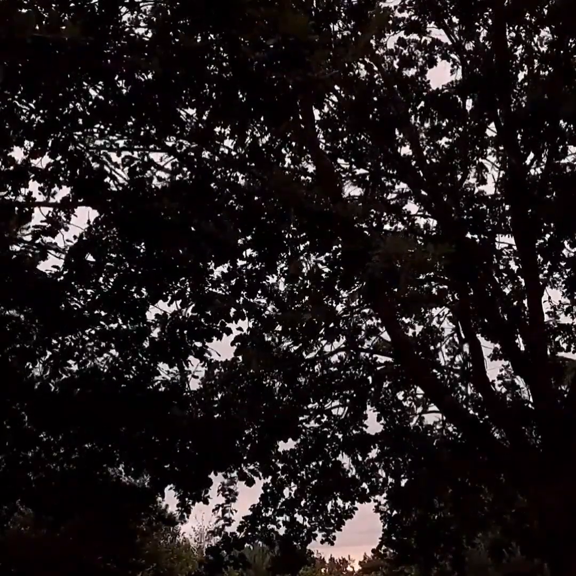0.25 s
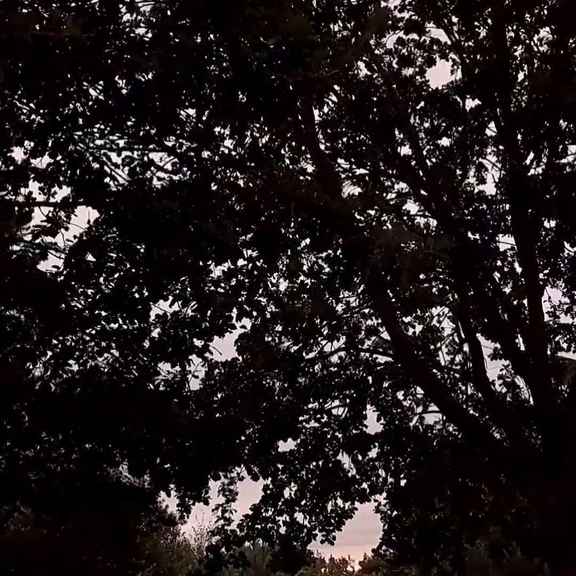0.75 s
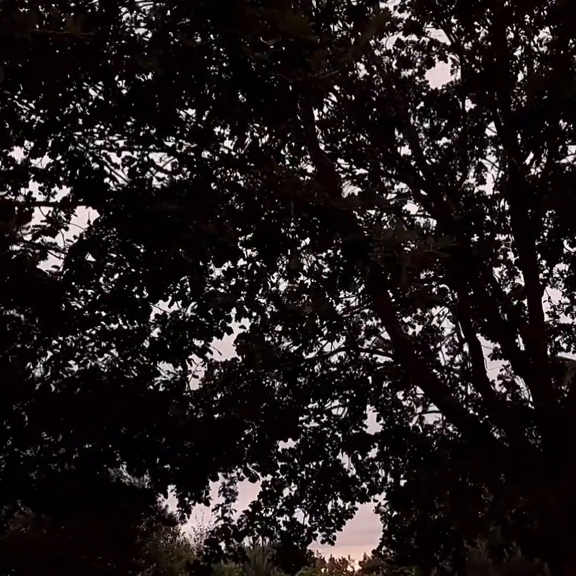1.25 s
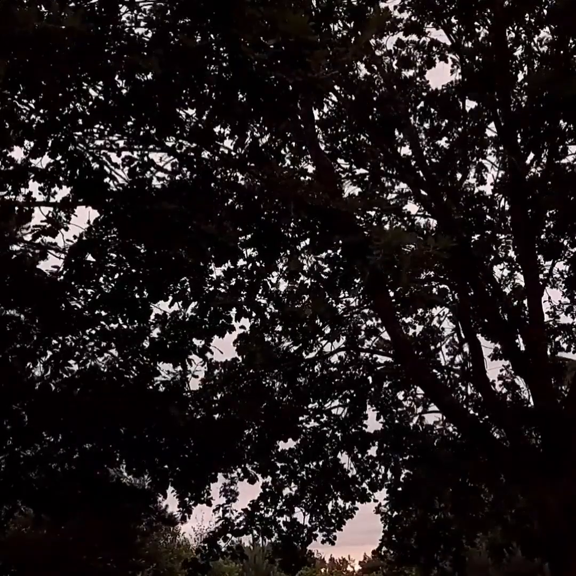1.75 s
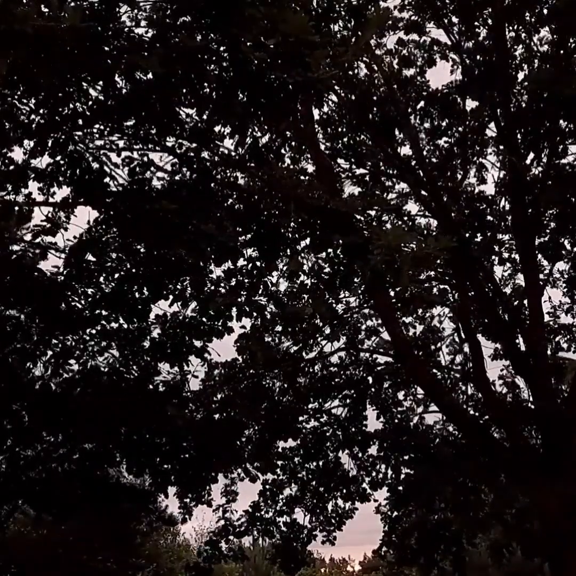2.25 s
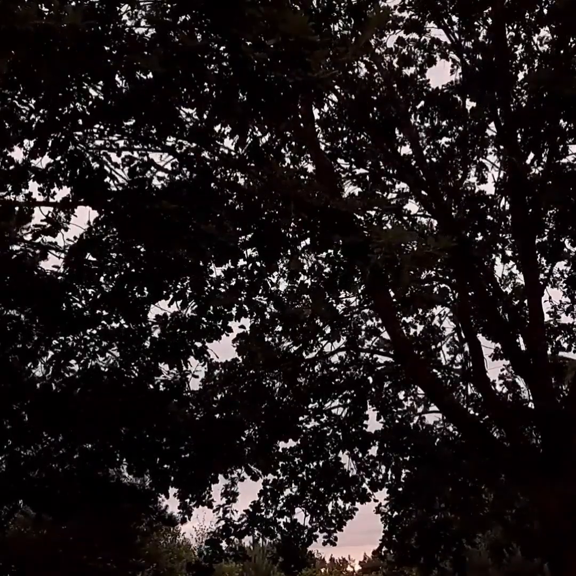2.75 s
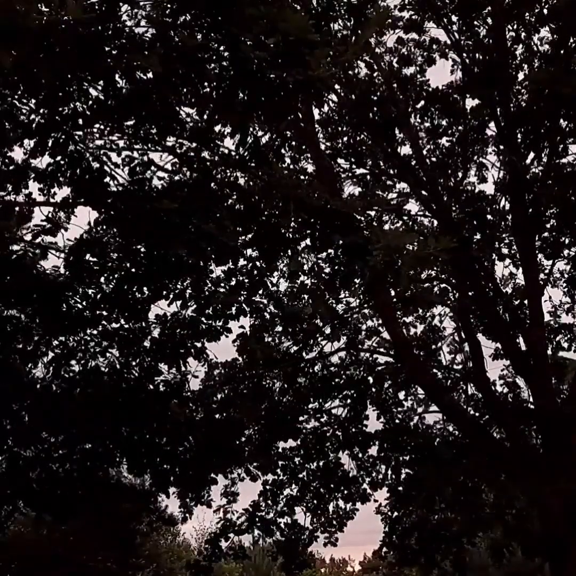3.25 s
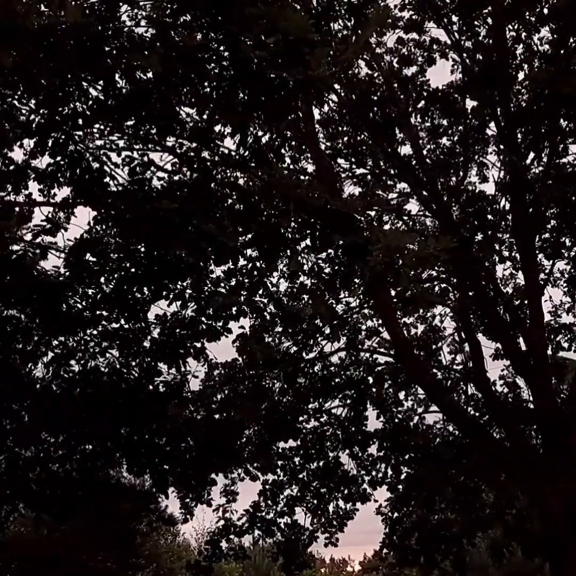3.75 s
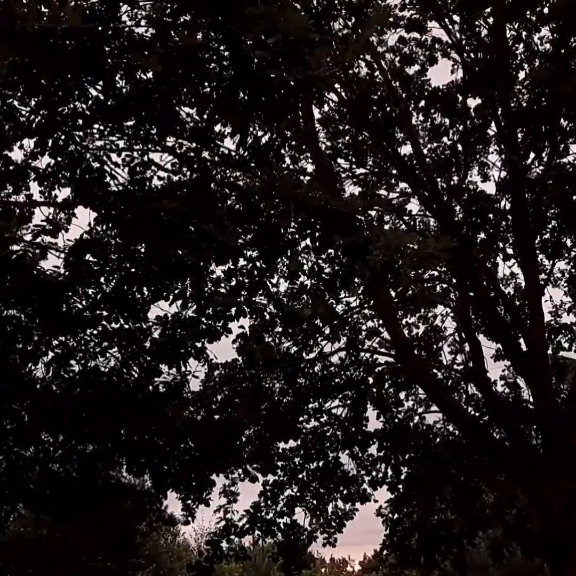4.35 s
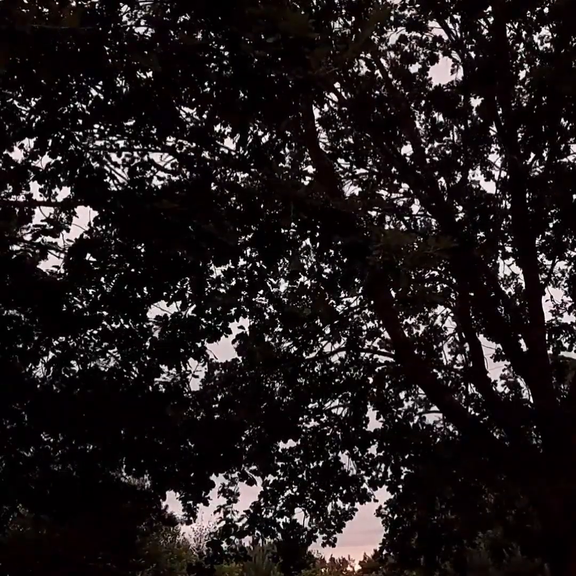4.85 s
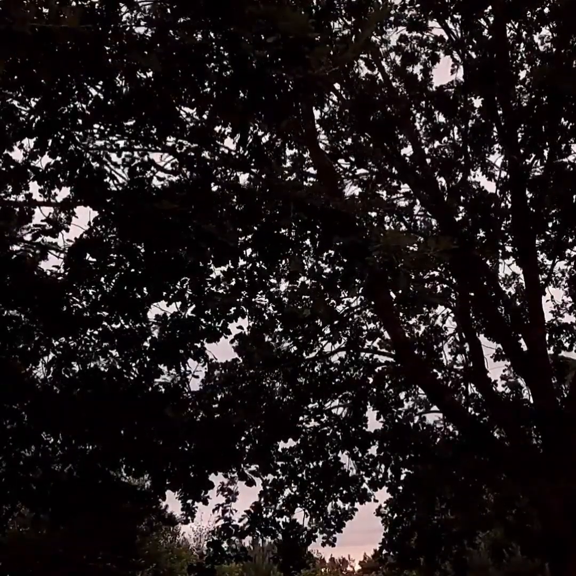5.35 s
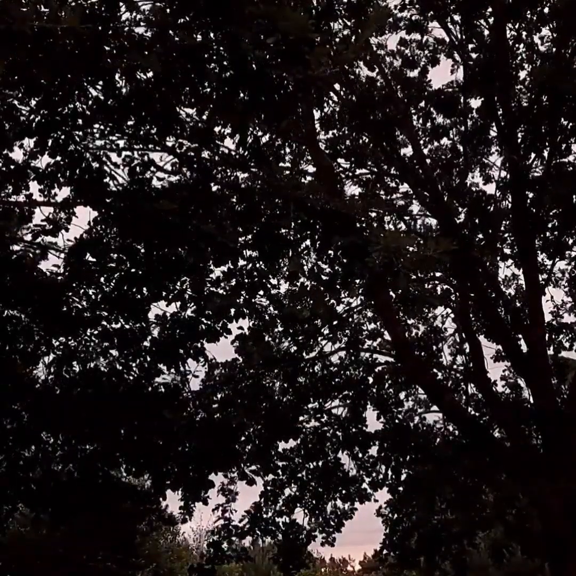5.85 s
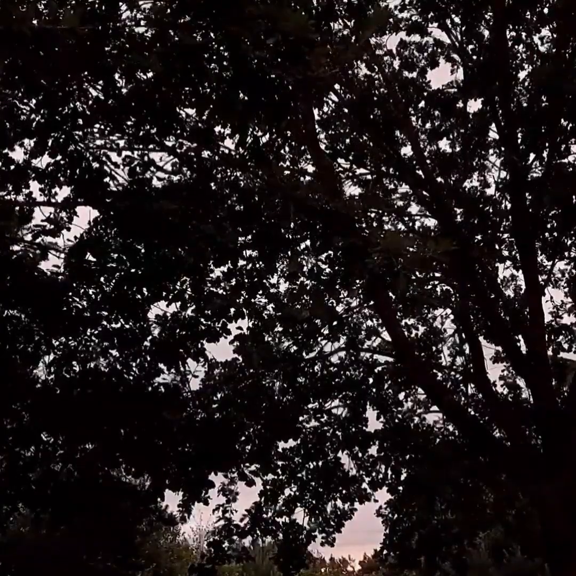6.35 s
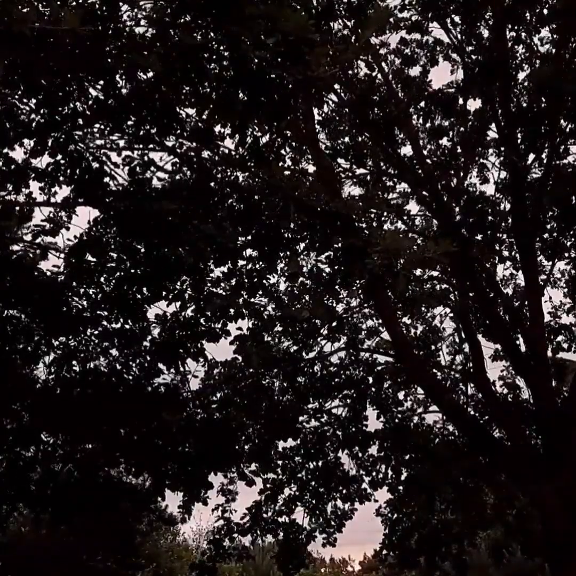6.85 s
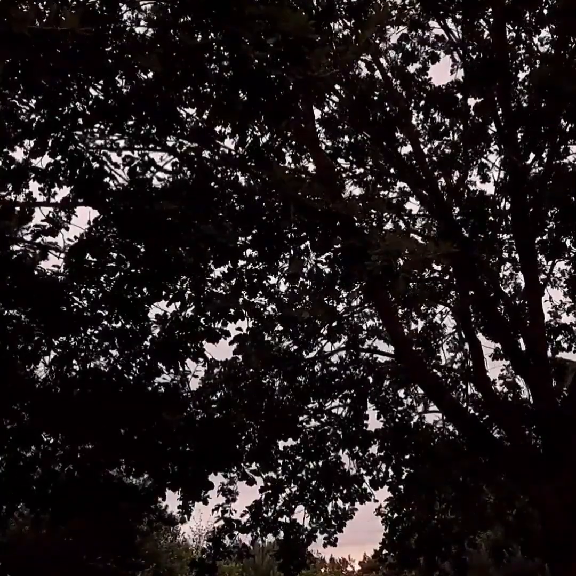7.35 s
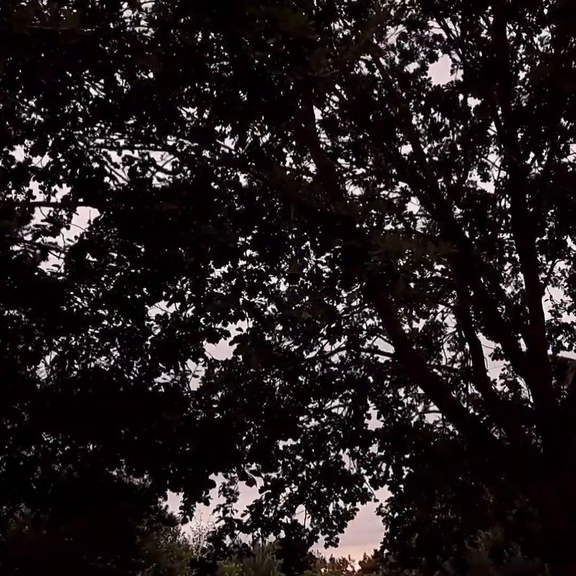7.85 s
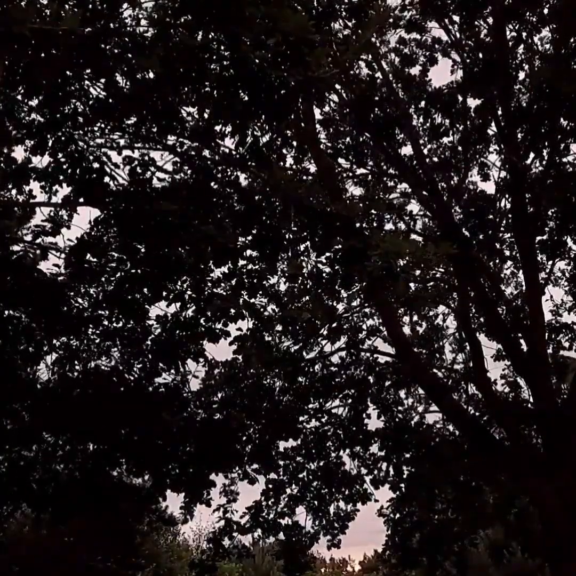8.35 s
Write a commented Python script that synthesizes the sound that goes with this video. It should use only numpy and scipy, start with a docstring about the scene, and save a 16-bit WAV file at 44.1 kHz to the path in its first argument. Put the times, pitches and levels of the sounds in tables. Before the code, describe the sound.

Dawn birds in a leafy tree, over quiet air and faint distant low hum, in stereo. At 0.15-0.25 s a soft, dull double knock bumps the microphone, left. A second sparrow chirps roundly at 0.2 and 0.7 s, and a near sparrow's bright two-syllable chirp enters left at 0.7, recurring near 2, 3, 4, 4.9, 6 and 7.9 s. A faint, even trill of eight falling chips runs 1-1.5 s. Softer sparrow answers come at 1.7, 2.7, 3.3, 4.5, 7.1 and 8.5 s. Short buzzy calls and a blurred far chorus fill in. From 4.5 to 7 s a songbird warbles quick sliding whistles, reverberant among leaves, with low faint answers. Breeze rises from 3.5 s on the left, buffeting in deep rumbling thumps at 5-6.4 s, then eases. Dry rasps and brisk buzzy calls cluster after 8 s, as low wind rises again.

```python
"""Dawn chorus under a leafy tree

Two sparrows chirp, a songbird whistles a phrase, and smaller calls, rasps, a trill and a far chorus fill
the gaps. Voices are sines of gliding, fluttering pitch; rasps are bursts of noise in a band. Sparse random
reflections stand for the foliage that scatters them. Shaped noise and single pressure pulses make a breeze
that buffets the microphone over quiet air, and two sagging sines make a soft double knock near the start."""
import sys
import numpy as np
from scipy import signal
from scipy.fft import rfft, irfft
from scipy.io import wavfile
from scipy.ndimage import uniform_filter1d

SR = 44100
rng = np.random.default_rng(int(sys.argv[2]) if len(sys.argv) > 2 else 0)


def output_pcm(signal):
    """Save a mono or channel-first signal as 16-bit PCM at the path in sys.argv[1].

    Samples are clipped to [-1, 1] before scaling.
    """
    pcm = np.clip(np.atleast_2d(signal).T, -1, 1) * 32767
    wavfile.write(sys.argv[1], SR, np.round(pcm).astype(np.int16))


N = 380141
TIME = np.arange(N) / SR  # s

# Colour of still air and far traffic. Each row: frequency in Hz, relative density in dB per Hz.
AIR_SPECTRUM = [(15, -26.5), (25, -14), (59, -1), (129, -1.5), (204, -3.5), (260, -7.5), (410, -8),
                (871, -19.5), (1300, -26), (3630, -20.5), (4500, -25), (8130, -25.5), (10100, -33),
                (12800, -27.5), (15500, -35)]
AIR_DB = -67.35  # level about which the air wanders
# Course of the breeze. Each row: time in seconds, relative level in dB, left minus right in dB.
BREEZE_COURSE = [(0, -58, -10), (.35, -58.5, 0.5), (.9, -62.5, -2.5), (1.25, -81, -6.5), (2.95, -74.5, 0.5),
                 (3.5, -59.5, 23), (3.8, -53.5, 26), (3.96, -43, 28), (5.05, -37.5, 22.5),
                 (5.401, -38.5, 7.5), (6.048, -42.5, -2), (6.35, -32.5, 3), (6.72, -46, -3.5),
                 (7.3, -50.5, -5), (7.85, -51.5, -12), (8.0, -55.5, 0), (8.4, -54.5, 5), (8.62, -33.5, 4)]
# Gusts riding on the breeze. Each row: time of the peak in seconds, length in seconds,
# relative level in dB, left minus right in dB.
GUST_PEAKS = [(0.158, 0.057, -48.5, -19), (0.588, 0.046, -50.5, -18), (4.314, .12, -34.5, 31),
              (4.496, 0.072, -37, 20), (4.889, 0.077, -30.5, 29), (5.1, 0.14, -24.5, 28),
              (5.305, .07, -31.5, 10), (5.527, 0.12, -25, 8.5), (5.69, 0.092, -25, -2),
              (5.841, 0.055, -27, -24), (5.951, 0.086, -25, -11.5), (6.181, 0.075, -28.5, 21),
              (6.535, 0.1, -38, -9), (6.975, 0.027, -43, 8), (7.52, 0.15, -44, -7), (8.039, 0.16, -42, 8),
              (8.17, 0.057, -39, -3.5)]
# Colour of a light breeze. Each row: frequency in Hz, relative density in dB per Hz.
LIGHT_SPECTRUM = [(20, -29.5), (37, -8), (59, 3), (72, -10), (93, -13), (125, -14), (195, -28.5),
                  (291, -36), (404, -40.5), (700, -56), (1500, -80)]
# Colour of a full gust. Each row: frequency in Hz, relative density in dB per Hz.
GUST_SPECTRUM = [(20, -41.5), (40, -1), (56, 11.5), (67, 6.5), (92, -3), (125, 1.5), (200, -15.5),
                 (356, -37), (510, -46), (882, -64), (1500, -93.5)]
FLUTTER_DB, FLUTTER_HZ = 2.02, 15  # how much and how often the eddies change the level at each port
# Single eddies that slap the left port. Each row: time in seconds, peak in dB before the mesh, width in seconds.
EDDIES = [(5.068, -15.5, 0.0027), (5.130, -16, 0.0026), (5.276, -17.5, 0.0025), (5.509, -14.5, 0.0015),
          (5.703, -17.5, 0.002), (6.177, -19.5, 0.0014), (6.239, -18, 0.0024), (6.283, -14.5, 0.002),
          (6.355, -14, 0.0015)]
# Soft knocks. Each row: start in seconds, level in dB before panning, settled pitch in Hz,
# time to decay by 60 dB in seconds.
BUMPS = [(.150, -47.5, 84.5, 0.036), (0.224, -31, 55, 0.13)]
# Dry ticks and rasps among the branches. Each row: start in seconds, length in seconds, centre in Hz,
# width in octaves, relative level in dB.
RASP_BURSTS = [(2.861, 0.02, 5760, .25, -62.5), (7.605, 0.15, 2280, 0.57, -73.5),
               (7.653, 0.074, 7300, .15, -80), (8.249, 0.025, 4270, 0.99, -70),
               (8.296, 0.012, 3930, 0.32, -57.5), (8.36, 0.024, 3800, 0.5, -58.5),
               (8.422, 0.023, 5500, 0.34, -61.5), (8.427, 0.05, 12500, 0.35, -64.5)]
# Loudest buzzy calls from deeper in the trees. Each row: start in seconds, length in seconds, pitch in Hz,
# glide in octaves, relative level in dB.
BUZZY_CALLS = [(0, 0.022, 3880, -.4, -55), (.01, 0.037, 2970, -.2, -61.5), (.10, .024, 3060, -0.16, -64),
               (0.378, 0.043, 7600, -.13, -69), (0.398, 0.091, 4910, -0.29, -63),
               (0.659, .05, 4000, 0.38, -53), (1.569, 0.044, 5170, 0, -65.5),
               (1.609, 0.036, 4220, 0.35, -61.5), (1.643, 0.044, 3390, -0.13, -58.5),
               (1.956, 0.066, 7680, -0.059, -59.5), (2.084, 0.025, 7860, 0.34, -59),
               (2.544, 0.04, 4290, -0.6, -65), (2.609, 0.091, 3777, 0.04, -59),
               (2.684, 0.045, 3207, 0.088, -61.5), (2.891, 0.026, 3160, 0.64, -62),
               (3.645, 0.096, 3415, -0.19, -68.5), (3.885, 0.079, 4900, -0.044, -62),
               (3.898, 0.17, 2700, -0.15, -65.5), (4.105, 0.052, 2950, 0.59, -59),
               (4.249, 0.1, 3350, -0.25, -67), (5.345, .13, 3790, -.17, -62.5),
               (5.427, 0.061, 4910, 0.065, -63), (6.571, 0.066, 4690, -0.4, -58),
               (6.591, 0.071, 4245, -.14, -50.5), (7.856, 0.053, 2170, -0.82, -65.5),
               (8.126, 0.026, 3956, -0.5, -52), (8.177, 0.015, 3470, 0.23, -56),
               (8.444, 0.014, 3680, 0.16, -45), (8.533, 0.021, 3455, .22, -51.5),
               (8.579, 0.033, 3470, -0.16, -55)]
BUZZ_HZ, BUZZ_DEPTH = 95.1, .04  # fast pitch warble of the buzzy calls: mean rate, share of the pitch
# A farther bird's low answers. Each row: start in seconds, length in seconds, start pitch in Hz,
# end pitch in Hz, relative level in dB.
ANSWER_NOTES = [(3.158, 0.048, 2206, 2000, -72), (3.498, 0.087, 2334, 2090, -77),
                (4.634, 0.042, 2170, 2070, -67.5), (5.387, 0.05, 1940, 1900, -76),
                (5.541, .083, 2222, 2296, -65.5), (5.90, .17, 2080, 2000, -74),
                (6.744, 0.056, 2020, 2006, -63.5)]
# The songbird's pure notes. Each row: start in seconds, length in seconds, start pitch in Hz,
# end pitch in Hz, relative level in dB.
WHISTLE_NOTES = [(4.5, 0.065, 2660, 2920, -56), (4.772, 0.047, 2340, 2550, -59.5),
                 (4.805, 0.057, 3490, 3460, -46.5), (4.863, 0.067, 2910, 2230, -54),
                 (5.005, 0.036, 3696, 2570, -48), (5.133, 0.039, 3810, 2647, -46.5),
                 (5.228, 0.1, 2956, 3087, -51.5), (5.30, .07, 2997, 2733, -53.5),
                 (5.453, 0.11, 2450, 2552, -60), (5.607, 0.081, 2900, 2600, -55.5),
                 (5.635, 0.072, 2677, 2655, -51), (5.712, 0.1, 1950, 2900, -55),
                 (5.787, .052, 2680, 2950, -54.5), (5.893, 0.039, 3240, 3225, -56),
                 (5.954, 0.034, 3350, 3050, -46), (6.12, 0.07, 3856, 3660, -51.5),
                 (6.2, .065, 2310, 3015, -53), (6.308, 0.048, 2680, 2760, -49.5),
                 (6.355, 0.025, 2700, 2110, -56), (6.378, 0.027, 1960, 2313, -56.5),
                 (6.409, 0.081, 2290, 1687, -64.5), (6.690, 0.03, 3510, 2870, -50.5),
                 (6.77, 0.096, 2430, 2750, -56), (6.824, .061, 3026, 2790, -55.5),
                 (6.893, 0.06, 3357, 2647, -50.5), (6.955, 0.0313, 3190, 2640, -65)]
ANSWER_PAN_DB, WHISTLE_PAN_DB = -2, 11  # left minus right
SLUR_BOW = 0.206  # a slur arches upward by this share of the interval it spans
# Near sparrow's two-syllable chirp. Each row: seconds from its start, pitch in Hz,
# level in dB before its range is narrowed.
NEAR_CHIRP = [(0, 3400, -27), (.012, 5400, -6), (.026, 5750, -9), (.033, 4330, -1), (.043, 4350, -1),
              (.049, 2950, -27), (.055, 3100, -32), (.061, 3720, -9), (.078, 4100, -8), (.093, 3650, -14),
              (.099, 2980, -18), (.111, 2600, -34)]
# Second sparrow's rounder chirp. Each row: seconds from its start, pitch in Hz,
# level in dB before its range is narrowed.
FAR_CHIRP = [(0, 3800, -20), (.009, 5250, 0), (.028, 5100, -3), (.046, 3900, -23), (.075, 3300, -38),
             (.090, 3800, -12), (.112, 4400, -10), (.125, 4100, -30)]
# Near sparrow's calls. Each row: start in seconds, relative level in dB,
# pitch ratio reached in the second syllable, left minus right in dB.
NEAR_CALLS = [(0.731, -37.5, 0.96, 6.5), (1.979, -37, 0.95, 8.5), (3.05, -38, 1.01, 7.5),
              (3.957, -36.5, 0.99, 11), (4.867, -38.5, 1.04, 10), (6.002, -37.5, 0.98, 12.5),
              (7.905, -39, 0.96, 9.5)]
# Second sparrow's calls. Each row: start in seconds, relative level in dB,
# pitch ratio reached later in the chirp, left minus right in dB.
FAR_CALLS = [(0.241, -47.5, 0.92, -2.3), (.687, -50, 0.78, 1.2), (1.707, -52, 0.93, -0.55),
             (2.705, -54.5, 1.18, -0.94), (3.298, -53.5, 0.98, 1.1), (4.505, -51, 1, -0.41),
             (7.073, -49, 0.92, 1.4), (8.458, -41.5, 0.83, -2.4)]
TOP_HZ = 15700  # upper limit of the recorder


def undb(db):
    """Decibel definition: amplitude gain is ten to the power of level over twenty."""
    return 10 ** (np.asarray(db) / 20)


def unit(x):
    """Normalisation: scale to an rms of 1."""
    return x / np.sqrt(np.mean(x ** 2))


def add(out, s, x):
    """Superposition: mix x into out from time s in seconds."""
    i = max(int(s * SR), 0)
    out[..., i:i + x.shape[-1]] += x[..., :max(N - i, 0)]


def sides(pan_db):
    """Interaural level difference: split it evenly into left and right gains."""
    return undb(np.vstack([pan_db, -pan_db]) / 2)


def walk(rate, n):
    """Low-passed randomness: held random values smoothed twice, with a spread near 1."""
    k = int(SR / rate)
    held = np.repeat(rng.standard_normal(n // k + 1), k)
    smooth = uniform_filter1d(uniform_filter1d(held, k), k)
    return 1.371 * smooth[:n]


def noise(spectrum):
    """Spectral shaping: colour unrelated left and right white noise."""
    hz, db = np.transpose(spectrum)
    f = np.maximum(np.fft.rfftfreq(N, 1 / SR), 1)
    gain = undb(np.interp(np.log(f), np.log(hz), db))
    return unit(irfft(rfft(rng.standard_normal((2, N))) * gain, N))


def coloured(n, hz, width_oct):
    """Band-limited noise: a burst in a bell-shaped band on the octave scale."""
    octaves = np.log2(np.maximum(np.fft.rfftfreq(n, 1 / SR), 1) / hz)
    bell = np.exp(-(octaves / width_oct) ** 2 / 2)
    return unit(irfft(rfft(rng.standard_normal(n)) * bell, n))


def syrinx(hz, db, rasp, rasp_hz):
    """Frequency modulation: a whistling membrane whose pitch flutters at random."""
    fluttering_hz = hz * (1 + rasp * walk(rasp_hz, len(hz)))
    return undb(db) * np.sin(2 * np.pi * np.cumsum(fluttering_hz) / SR)


def overtones(hz, db, rasp):
    """Harmonic filtering: rough second and third harmonics; the beak lets them out only high up."""
    total = 0
    for k in (2, 3):
        beak = 1 / (1 + ((k * hz - 11500) / 2400) ** 2)
        total = total + syrinx(k * hz, db, rasp, 2500) * beak / k
    return total


def slur(start_hz, end_hz):
    """Pitch contour of a glide: the wider the slide, the more its middle arches."""
    return [start_hz, (start_hz + end_hz) / 2 + SLUR_BOW * abs(end_hz - start_hz), end_hz]


def note(length, pitches, db, rasp, rasp_hz):
    """Parabolic glide: one note slurred through three pitches, fading in and out."""
    u = np.linspace(0, 1, int(length * SR))
    hz = np.polyval(np.polyfit([0, .5, 1], pitches, 2), u)
    return syrinx(hz, db - 3 * u, rasp, rasp_hz) * signal.windows.tukey(len(u), .3)


def buzzy(length, pitches, db):
    """Joint frequency and amplitude modulation: a slurred note warbles fast and unevenly."""
    u = np.linspace(0, 1, int(length * SR))
    warble = np.sin(2 * np.pi * np.cumsum(BUZZ_HZ * (1 + .25 * walk(60, len(u)))) / SR)
    glide = np.polyval(np.polyfit([0, .5, 1], pitches, 2), u)
    hz = glide * (1 + BUZZ_DEPTH * warble)
    call = syrinx(hz, db - 3 * u + 1.4 * warble, rasp=0.0403, rasp_hz=498)
    return call * signal.windows.tukey(len(u), .3)


def phrase(notes, rasp):
    """Superposed glides: one bird's run of slurred whistles."""
    out = np.zeros(N)
    for s, length, start_hz, end_hz, db in notes:
        add(out, s, note(length, slur(start_hz, end_hz), db, rasp, rasp_hz=427))
    return out


def foliage(x, wet_db, t60, late_db, late_t60):
    """Multiple scattering: leaf and trunk reflections thicken with time, with a fainter tail from the gardens."""
    t = TIME[:SR]
    decay = undb(-60 * t / t60) + undb(late_db - 60 * t / late_t60)
    fade = decay * (1 - np.exp(-t / 0.001))
    per_second = 700 + 6000 * t  # density of reflections
    taps = rng.random((2, SR)) < per_second / SR
    echoes = taps * rng.standard_normal((2, SR)) * fade / np.sqrt(per_second)
    return undb(wet_db) * signal.fftconvolve(x[None], unit(echoes) / np.sqrt(SR), axes=1)[:, :N]


def echo(x, delay_s, db):
    """Specular reflection: one distinct return from a trunk or wall."""
    out = np.zeros_like(x)
    add(out, delay_s, undb(db) * x)
    return out


def still_air():
    """Ambient noise: a steady colour whose level wanders slightly."""
    return noise(AIR_SPECTRUM) * undb(AIR_DB + 0.6 * walk(6.1, N))


def pressure(db, pan_db):
    """Power division: share the power of the wind between the two ports."""
    ports = sides(pan_db) ** 2
    return undb(db) ** 2 * ports / ports.mean(0)


def wind():
    """Turbulence at each port: the harder it blows, the smaller the eddies and the brighter the rumble."""
    s, level_db, pan_db = np.transpose(BREEZE_COURSE)
    power = pressure(np.interp(TIME, s, level_db), np.interp(TIME, s, pan_db))
    flutter = np.array([walk(FLUTTER_HZ, N) for _ in range(2)])
    power = power * undb(FLUTTER_DB * flutter) ** 2
    for s, length, db, pan_db in GUST_PEAKS:
        swell = np.exp(-2 * (2 * (TIME - s) / length) ** 2)
        power = power + pressure(db, pan_db) * swell
    force = np.clip((10 * np.log10(power) + 34) / 11, 0, 1)  # 0 light breeze, 1 full gust
    angle = force * np.pi / 2
    rumble = np.cos(angle) * noise(LIGHT_SPECTRUM) + np.sin(angle) * noise(GUST_SPECTRUM)
    # even out the noise so that the power alone sets the level
    rumble /= np.sqrt(uniform_filter1d(rumble ** 2, size=4000, axis=1))
    return rumble * np.sqrt(power) * undb(1.16)


def buffets():
    """Vortex pressure: each eddy is a brief suction between two pushes; the port's mesh dulls it."""
    out = np.zeros(N)
    t = np.arange(-SR // 20, SR // 20) / SR
    for s, db, width in EDDIES:
        u = t / width
        pulse = (u ** 2 - 1) / (1 + u ** 2) ** 2
        add(out, s + t[0], undb(db) * pulse * np.hanning(len(t)))
    mesh = signal.butter(2, 750, fs=SR, output="sos")
    return signal.sosfiltfilt(mesh, out + 1e-18) * undb([[0], [-20]])


def knocks():
    """Damped contact vibration: dull bumps on the microphone's support sag in pitch as the contact relaxes."""
    out = np.zeros(N)
    t = TIME[:SR // 2]
    for s, db, hz, t60 in BUMPS:
        sagging_hz = hz * (1 + 2.04 * np.exp(-t / 0.0093))
        phase = 2 * np.pi * np.cumsum(sagging_hz) / SR
        add(out, s, np.sin(phase) * undb(db - 60 * t / t60) * (1 - np.exp(-t / 0.0074)))
    return out * sides(20)


def chorus(count=140):
    """Superposition of many far sources: random bird slurs blurred together."""
    out = np.zeros(N)
    for when, span, height, slope, loud in rng.random((count, 5)):
        tilt = 1 + 0.17 * (slope - .5) * np.array([1, 0, -1])
        pitches = 2700 * 1.4 ** height * tilt
        add(out, when * N / SR, note(0.016 + 0.056 * span, pitches, -81 + 6 * loud, rasp=0.05, rasp_hz=200.0))
    return undb(-1) * out + foliage(out, wet_db=-10.5, t60=0.96, late_db=-30.5, late_t60=1.2)


def trill(count=8):
    """Periodic repetition: a far bird gives one short falling chip at an even pace."""
    out = np.zeros(N)
    for k in range(count):
        s = .998 + .073 * k
        add(out, s, note(0.0187, [3750, 3480, 3300], -71.5, rasp=0.0053, rasp_hz=395))
    return out + foliage(out, wet_db=-1, t60=0.62, late_db=-22, late_t60=.9)


def rasps():
    """Aperiodic excitation: toneless noise bursts that spread into the leaves."""
    out = np.zeros(N)
    for s, length, hz, width_oct, db in RASP_BURSTS:
        n = int(length * SR)
        add(out, s, undb(db) * coloured(n, hz, width_oct) * signal.windows.tukey(n, .6))
    return undb(-3) * out + foliage(out, wet_db=0.5, t60=0.49, late_db=-27, late_t60=.8)


def neighbours(count=14):
    """Scattered field over direct field: buzzy calls come mostly by way of the leaves, with random fainter ones."""
    out = np.zeros(N)
    for s, length, hz, glide_oct, db in BUZZY_CALLS:
        pitches = hz * 2 ** (glide_oct * np.array([-.5, 0, .5]))
        add(out, s, buzzy(length, pitches, db))
    # one fainter call at a random moment of each equal share of the time
    for k, (when, span, height, loud) in enumerate(rng.random((count, 4))):
        hz = 3000 * 1.3 ** height
        s = (k + when) / count * N / SR
        add(out, s, buzzy(.025 + .06 * span, slur(hz, 0.97 * hz), -75 + 6 * loud))
    return undb(-6.5) * out + foliage(out, wet_db=3.5, t60=0.56, late_db=-27.0, late_t60=1.0)


def far_songbird():
    """Reverberation at a distance: low, soft whistles from another tree."""
    song = phrase(ANSWER_NOTES, rasp=0.02)
    return sides(ANSWER_PAN_DB) * song + foliage(song, wet_db=3.5, t60=0.5, late_db=-17.5, late_t60=0.79)


def songbird():
    """Near-sinusoidal tones in a reverberant field: a warbled phrase of clean whistles hangs in the trees."""
    song = phrase(WHISTLE_NOTES, rasp=.015)
    direct = undb(-4.0) * sides(WHISTLE_PAN_DB) * song
    return direct + foliage(song, wet_db=3.0, t60=0.47, late_db=-14, late_t60=1.0)


def sparrow(shape, chirps, rasp, throat_hz, overtone_db, lag_s, wet_db, t60):
    """Source and filter: a repeated chirp is roughest where it is highest and bright when it is loudest."""
    knots, pitch, level = np.transpose(shape)
    t = TIME[:int(knots[-1] * SR)]
    hz = uniform_filter1d(np.interp(t, knots, pitch), size=90)
    strain = .45 + .55 * (hz / hz.max()) ** 4
    loudest = max(row[1] for row in chirps)
    edges = signal.windows.tukey(len(t), .08)
    direct, edge_tone = np.zeros((2, N)), np.zeros(N)
    for s, db, lift, pan_db in chirps:
        sung = hz * np.interp(t, [knots[-1] / 3, knots[-1] / 2], [1, lift])
        effort_db = db + 0.78 * np.interp(t, knots, level) + 2.6 * walk(450, len(t))
        add(direct, s, sides(pan_db) * syrinx(sung, effort_db, rasp * strain, 700) * edges)
        bright_db = effort_db + overtone_db + db - loudest
        add(edge_tone, s, overtones(sung, bright_db, rasp=0.075) * edges)
    # the throat resonance closes steeply at throat_hz
    throat = signal.butter(10, throat_hz, fs=SR, output="sos")
    direct = signal.sosfiltfilt(throat, direct + 1e-18)
    # the harmonics beam away into the crown and come back scattered
    scattered = foliage(direct[0] + edge_tone, wet_db, t60, late_db=-23.5, late_t60=0.84)
    # twigs right beside the bird blur each stroke
    scattered += foliage(direct[0], wet_db=-13, t60=0.22, late_db=-36, late_t60=0.23)
    # the sound reaches one port before the other
    ports = np.array([direct[0], np.roll(direct[1], int(lag_s * SR))])
    return ports + scattered + undb(-6.5) * edge_tone


def sparrows():
    """Direct-to-reverberant ratio: one bird is close on the left, its partner is heard mostly through the leaves."""
    near = sparrow(NEAR_CHIRP, NEAR_CALLS, rasp=0.045, throat_hz=6040, overtone_db=-12.5,
                   lag_s=.00046, wet_db=-5.5, t60=0.41)
    far = sparrow(FAR_CHIRP, FAR_CALLS, rasp=.03, throat_hz=5500, overtone_db=-11,
                  lag_s=-0.00023, wet_db=3, t60=0.43)
    return near + echo(near, delay_s=0.043, db=-16.5) + undb(-3) * far


def scene():
    """Linear superposition: quiet air, breeze, knocks and birds add up."""
    background = still_air() + wind() + buffets() + knocks()
    small_voices = chorus() + trill() + rasps() + neighbours()
    return background + small_voices + far_songbird() + songbird() + sparrows()


def record(dry):
    """Band limitation: the recorder cuts the top with a steep elliptic low-pass."""
    return signal.sosfilt(signal.ellip(10, .2, 80, TOP_HZ, fs=SR, output="sos"), dry)


dry = scene()
out = record(dry)
output_pcm(out)
```